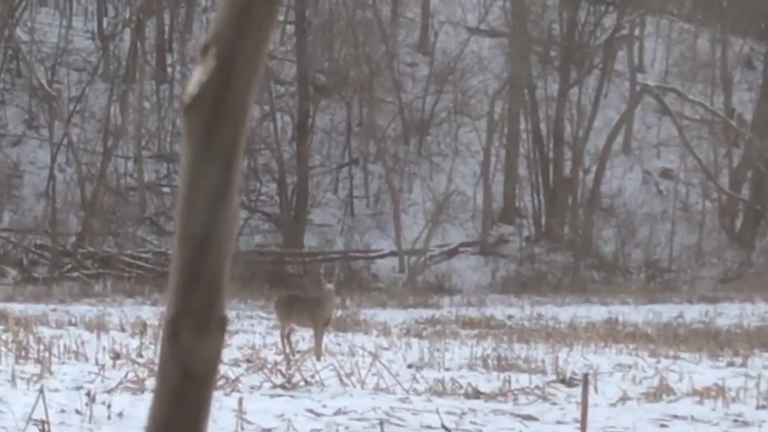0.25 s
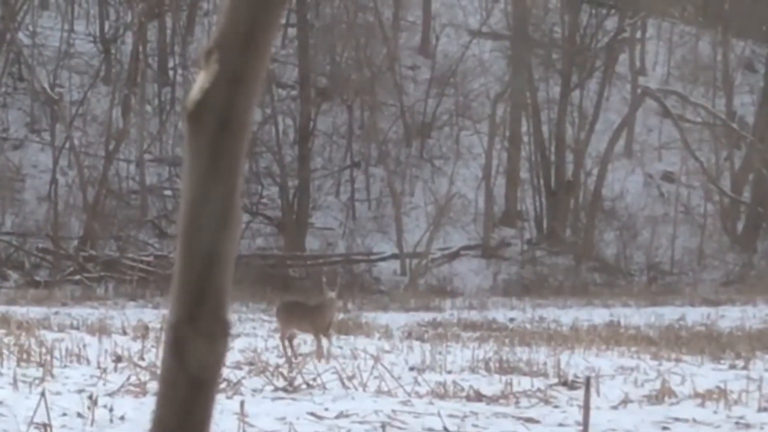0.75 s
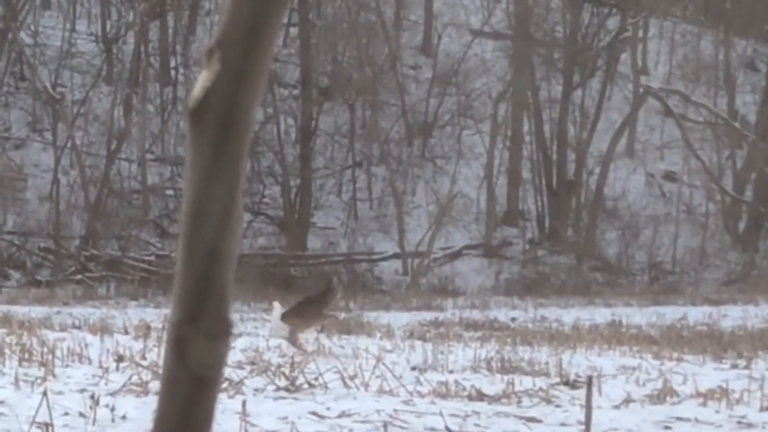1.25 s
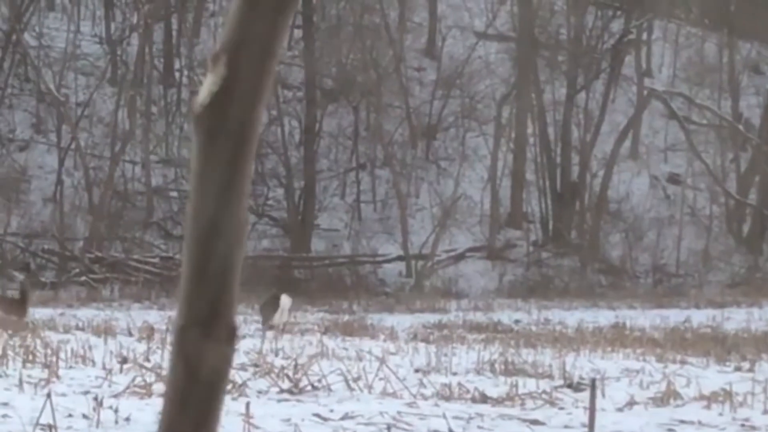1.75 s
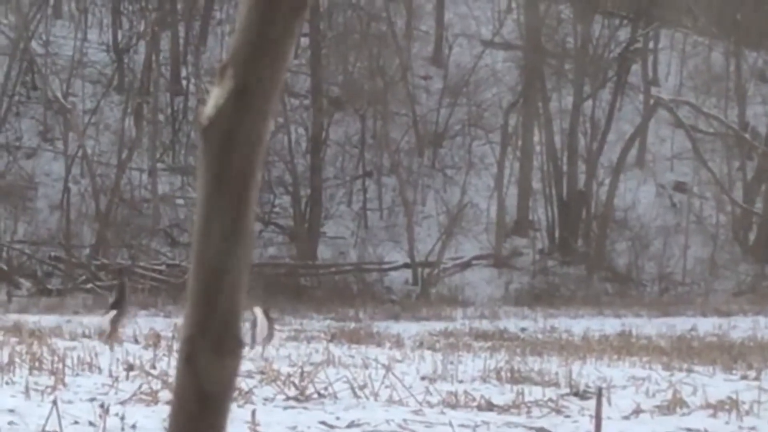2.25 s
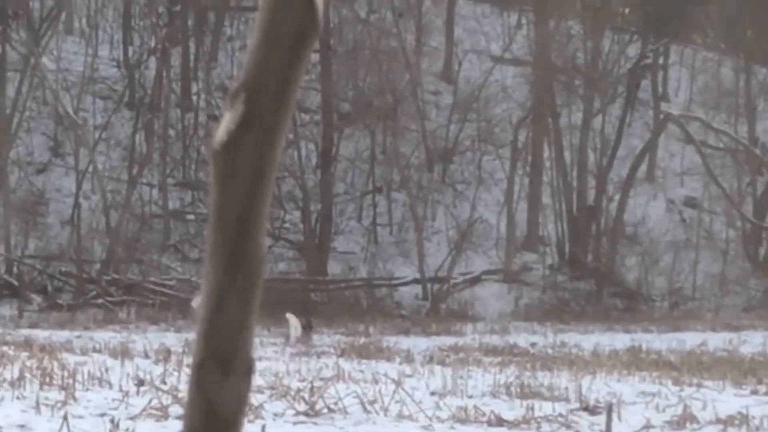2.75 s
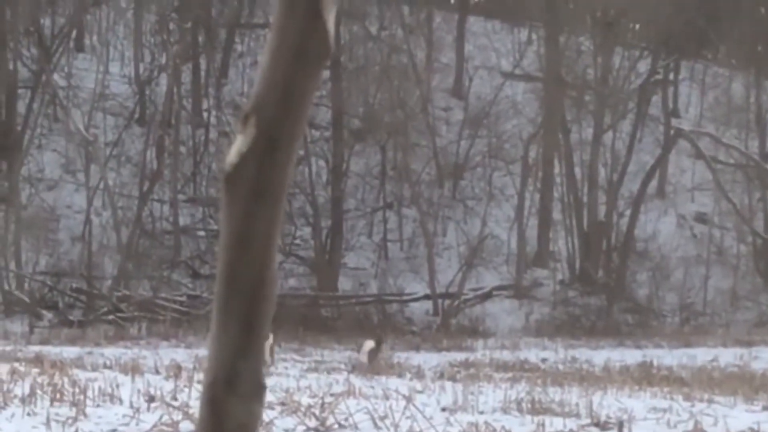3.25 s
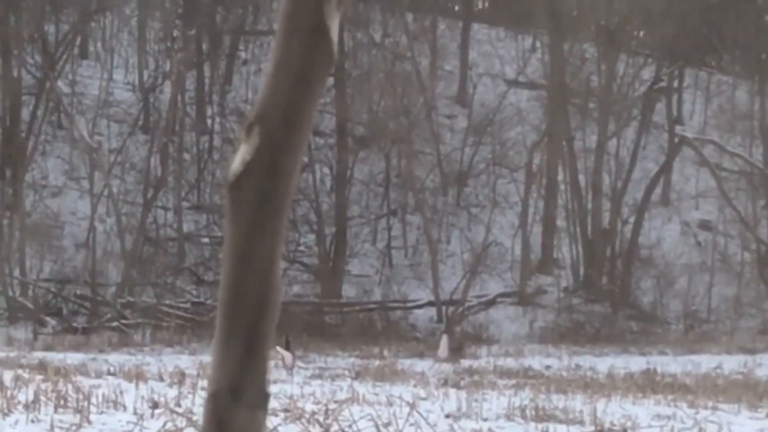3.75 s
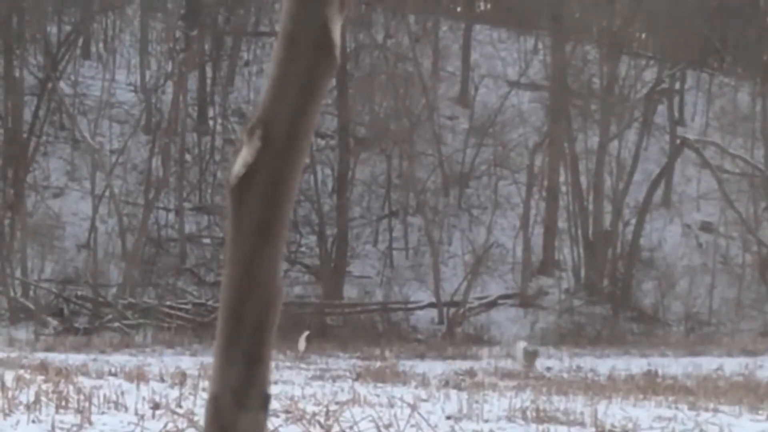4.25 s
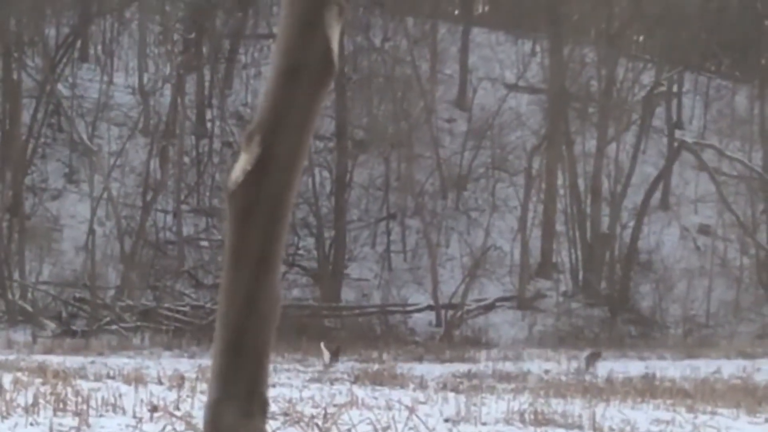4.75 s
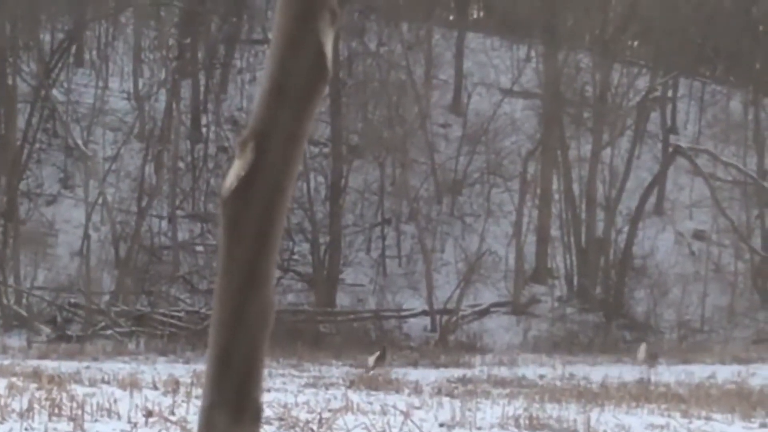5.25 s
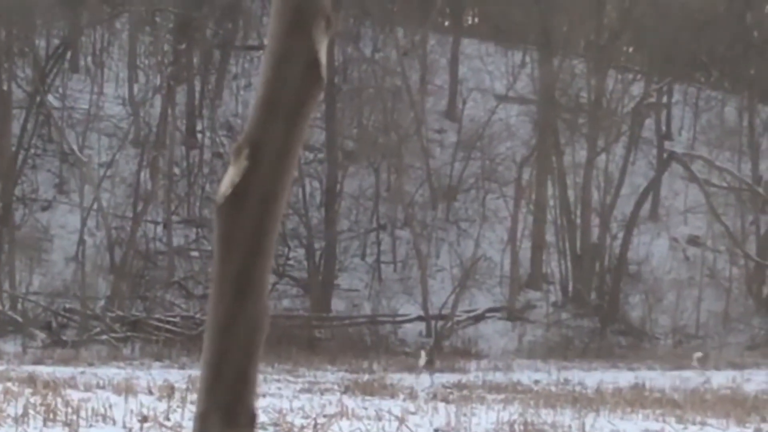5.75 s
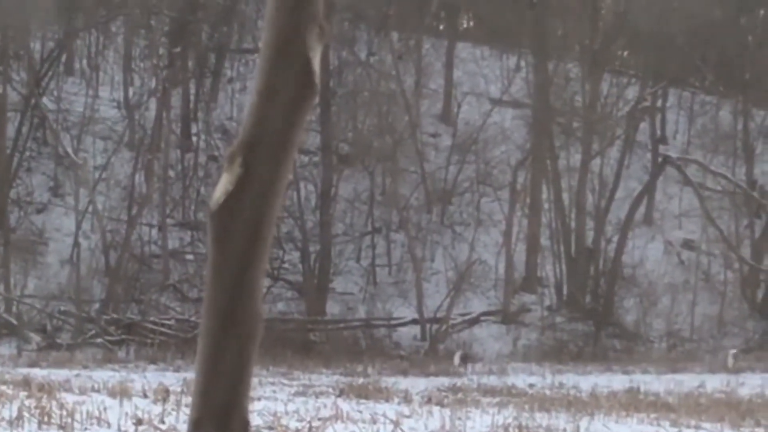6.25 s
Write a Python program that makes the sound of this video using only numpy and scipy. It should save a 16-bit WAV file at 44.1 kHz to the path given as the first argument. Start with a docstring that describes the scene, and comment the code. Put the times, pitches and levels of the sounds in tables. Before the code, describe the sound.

A crossbow fires with a loud, sharp snap, followed by a distant smack and knock, then light clothing rustle and faint clicks.

```python
"""A hunting blind by a snowy field. A crossbow fires close by: the string rasps down the rail,
the limbs slam home and the frame rings. The bolt smacks far out in the field, a knock follows,
and the wooded slope answers faintly. Then clothing rustles and gear ticks and squeaks as a camera
is turned on its mount, over a low outdoor rumble and a thin hiss of air."""
import sys
import numpy as np
from scipy import signal
from scipy.fft import rfft, irfft, next_fast_len
from scipy.io import wavfile
from scipy.ndimage import map_coordinates

SR = 44100
rng = np.random.default_rng(int(sys.argv[2]) if len(sys.argv) > 2 else 0)


def log_audio(samples):
    """Write samples as a 16-bit WAV file to the path given in sys.argv[1]."""
    # one column per channel
    frames = np.atleast_2d(samples).T
    # limit to full scale, then quantise
    limited = np.clip(frames, -1, 1)
    pcm = np.round(limited * 32767).astype(np.int16)
    wavfile.write(sys.argv[1], SR, pcm)


N = 287111
T = np.arange(N) / SR


# Envelopes of the string's run and the limbs' slam. Each: start in seconds, level in dB, then rise,
# hold and t60 in seconds.
STRING_STROKE = (.437, -9, .002, .007, .055)
LIMB_STROKE = (.446, -10.3, .007, .013, .064)
# Tone of the string on the rail, and of the limbs and cams. Each row: frequency in Hz, relative dB.
RAIL_TONE = [(180, -41), (300, -11), (581, -20), (1260, -4), (2480, -15), (2690, -7), (3510, -1),
             (4800, -9), (5130, -3), (6400, -4), (7500, -11), (8420, -8), (13400, -11), (15500, -16)]
SLAM_TONE = [(150, -43), (250, -13), (603, -11), (717, -4), (961, -8), (1290, -2.5), (1530, -11), (1790, 1),
             (2090, -8), (3160, -4), (4100, -12), (4470, -7), (5500, -13), (9230, -12), (15500, -17)]
# Resonances of the stock and riser. Each row: frequency in Hz, width in Hz, relative level in dB.
FRAME_MODES = [(727, 63, -4), (899, 71, -4), (1270, 68, -1), (1750, 49, 0), (2230, 36, -4), (2740, 31, -3),
               (2890, 24, -4), (3180, 75, -2), (3350, 64, -5), (3940, 140, -7), (4320, 37, -4),
               (4540, 71, -6), (5210, 180, -7), (5770, 17, -7), (6000, 45, -6), (6600, 120, -3),
               (6930, 150, -10), (7230, 51, -7), (7420, 25, -11), (7880, 19, -13)]
# Low modes of the limbs and stock, the weight of the shot. Each row: start in seconds, level in dB,
# pitch in Hz, t60 and rise in seconds.
RECOIL_MODES = [(.44, -34, 66, .14, .008), (.4395, -21, 173, .085, .007), (.441, -27, 238, .07, .005),
                (.455, -34, 380, .1, .012), (.446, -28.5, 511, .085, .008), (.445, -28, 727, .07, .008),
                (.441, -24, 897, .07, .008), (.439, -22.5, 1060, .07, .006)]

def crossbow(frame_db):
    """The trigger scrapes, the string runs down the rail, the limbs hit home and shake the frame."""
    trigger = (stroke(.4165, -52, .001, .001, .02) + stroke(.418, -47, .011, .008, .02)) * noise(SLAM_TONE)
    string, limbs = stroke(*STRING_STROKE), stroke(*LIMB_STROKE)
    rasp = string * noise(RAIL_TONE) + limbs * noise(SLAM_TONE)
    chatter = (limbs + string) * rng.standard_normal(N)
    frame = filtered(chatter, lambda f: sum((-1) ** k * amp(db) * resonance(f, hz, width)
                                            for k, (hz, width, db) in enumerate(FRAME_MODES)))
    # the release kicks the whole bow, which shoves the air around it
    recoil = sum(thump(*mode) for mode in RECOIL_MODES)
    return trigger + rasp + amp(frame_db) * frame + recoil


# Ring of the cables and metal fittings. Each row: pitch in Hz, relative dB, uncapped t60 in seconds.
FITTING_PARTIALS = [(248, -18, 3.4), (522, 0, 0.13), (926, -14, 0.27), (1297, 0, 0.14), (1782, -10, 0.45),
                    (2250, -9, 0.24), (2848, -15, 0.41), (3725, -17, 0.21), (4506, 0, 0.15),
                    (5825, -23, 0.28), (6600, -7, 0.19), (6885, -12, 0.11)]
# The slack cable's hum: pitch in Hz, level in dB, t60 in seconds.
CABLE_HUM = (238, -53.5, .3)

def cables(ring_db, longest_t60):
    """Cables and fittings buzz on unsteadily after the shot, over the hum of the slack cable."""
    ring = np.zeros(N)
    for hz, db, t60 in FITTING_PARTIALS:
        envelope = stroke(.45, ring_db + db, .008, .025, min(t60, longest_t60))
        ring += envelope * np.sin(2 * np.pi * hz * T + .8 * wobble(110))
    hum_hz, hum_db, hum_t60 = CABLE_HUM
    return ring + thump(.48, hum_db, hum_hz, hum_t60, rise=.06)


# Tone of the bolt's smack, and of the knock after it. Each row: frequency in Hz, relative dB.
SMACK_TONE = [(410, -39), (700, -9), (1970, -8), (2800, -17), (3150, -2), (4410, -5), (5860, 0),
              (6940, -10), (9720, -5), (15500, -12)]
KNOCK_TONE = [(440, -40), (750, -10), (1130, 2), (1600, -5), (1840, -2), (2250, -5), (2660, -17),
              (3350, -3), (4260, -1), (5020, -14), (6070, -4), (7340, -5), (10600, -20), (13700, -17),
              (15500, -22)]

def bolt_impact():
    """The bolt lands with a crunchy smack; a hard knock follows, its thud sagging in pitch."""
    smack = stroke(.667, -37.5, .003, .002, .022) + stroke(.672, -48.5, .003, .004, .07)
    knock = stroke(.8897, -44, .0005, .001, .01) + stroke(.8913, -33, .0005, .001, .012)
    knock_tail = stroke(.893, -50, .002, 0, .14)
    thud = thump(.893, -42, 170, .04, .003) + thump(.8905, -36.5, 112, .068, .008)  # the low one lingers
    return smack * noise(SMACK_TONE) + (knock + knock_tail) * noise(KNOCK_TONE) + thud


# The hollow of the blind: start in seconds, level in dB, pitch in Hz, t60 and rise in seconds.
BLIND_BOOM = (.475, -43, 135, .16, .012)

def blind():
    """The blind rings and booms briefly around the shot."""
    return stroke(.46, -39, .02, 0, .26) * noise(SLAM_TONE) + thump(*BLIND_BOOM)


# Tone of the echo off the slope. Each row: frequency in Hz, relative dB.
ECHO_TONE = [(100, -9), (250, 0), (520, 2.5), (800, 1.5), (1200, 0), (1700, -3), (4000, -7.5),
             (15000, -13.5)]
# Decay of that echo. Each row: frequency in Hz, t60 in seconds.
ECHO_DECAY = [(200, 2.5), (600, 2.8), (1200, 2.2), (3000, 1.4), (7000, .6), (15000, .4)]

def wooded_slope(level_db, hold_until_s):
    """Ever farther trunks scatter the shot back as a steady wash, which then fades, treble first."""
    hz, t, bands = signal.stft(noise(ECHO_TONE), SR, nperseg=256)
    fade = amp(-60 * np.maximum(t - hold_until_s, 0) / along(ECHO_DECAY, hz)[:, None])
    wash = signal.istft(bands * fade, SR, nperseg=256)[1][:N]
    fade_in = np.clip((T - .45) / .15, 0, 1)
    return amp(level_db) * fade_in * wash


# Small movements of clothing. Each row: moment of top speed in seconds, relative dB, length in seconds.
FABRIC_MOVES = [(.225, -72, .04), (.338, -67, .05), (.9, -67.5, .33), (1.126, -58, .02), (1.27, -73, .03),
                (1.42, -73, .07), (1.601, -68, .16), (1.798, -65, .09), (2.04, -61, .2), (2.47, -59.5, .44),
                (2.778, -62.5, .2), (2.926, -58, .135), (3.087, -59, .087), (3.228, -59.6, .077),
                (3.341, -67, .05), (3.52, -62.4, .18), (3.683, -63, .045), (3.773, -67.5, .02),
                (3.852, -57.5, .055), (3.925, -62, .05), (4.112, -62.4, .05), (4.202, -66.6, .085),
                (4.377, -60.5, .14), (4.487, -61, .05), (4.601, -67, .042), (4.691, -65.5, .04),
                (4.796, -61, .08), (5.063, -60, .06), (5.155, -68, .056), (5.29, -70, .16),
                (5.45, -62.5, .06), (5.83, -67, .07), (6.057, -62, .186), (6.228, -64, .09),
                (6.348, -63, .08), (6.48, -70, .11)]

def fabric_motion(creep_db, edge_db):
    """Envelope of sliding fabric: each move swells and fades; after the shot it never quite rests."""
    power = amp(creep_db) ** 2 * (T > STRING_STROKE[0])
    for s, db, length in FABRIC_MOVES:
        near = np.abs(T - s) < 2 * length
        half_lengths = 2 * (T[near] - s) / length
        power[near] += amp(db - edge_db * half_lengths ** 2) ** 2
    return np.sqrt(power)


# Tone of the fabric's hiss, and of its rumble in the mount. Each row: frequency in Hz, relative dB.
FABRIC_TONE = [(300, -15), (600, -6), (1200, -6), (1800, -3), (4000, -3.5), (5900, -2), (7700, -7),
               (9000, -4), (10400, -9), (12500, -4.5), (15500, -9.5)]
HANDLING_TONE = [(30, -14), (90, -4), (170, 0), (280, -13), (500, -16), (900, -40)]

def clothing(slide_db, flutter_db, handling_db, catches_per_s, spread_db, crackle_db):
    """Fabric slides with a hiss, fibres catch and let go, and the motion rumbles through the mount."""
    motion = fabric_motion(creep_db=-80.5, edge_db=6)
    catches = rng.random(N) < catches_per_s / SR
    strength = amp(spread_db * np.minimum(rng.exponential(size=N), 3))
    grain_envelope = signal.fftconvolve(catches * strength, np.hanning(48))[:N]
    grains = coloured(grain_envelope * rng.standard_normal(N), FABRIC_TONE)
    brisk = amp(-60)  # level of a brisk movement
    # the power below 1 keeps slow motion crackling when the hiss has almost gone
    crackle = amp(crackle_db) * brisk * (motion / brisk) ** .75 * grains
    slide = amp(slide_db + flutter_db * wobble(60)) * motion
    return slide * (noise(FABRIC_TONE) + amp(handling_db) * noise(HANDLING_TONE)) + crackle


# Scuffs of a sleeve. Each row: start in seconds, level in dB, hold in seconds.
SLEEVE_SCUFFS = [(.315, -70, .02), (1.025, -65, .03), (1.13, -63, .014), (1.255, -67, .012),
                 (1.5, -69, .15), (1.97, -64, .12), (2.28, -67.5, .7), (4.15, -70.5, .3), (6.02, -70, .04)]
# Their dull tone. Each row: frequency in Hz, relative dB.
SLEEVE_TONE = [(150, -4), (500, -3), (1000, -1), (1900, 0), (3000, -8), (6000, -16), (15000, -28)]

def sleeve():
    """A sleeve rubs in soft, dull scuffs."""
    return sum(stroke(s, db, .012, hold, .12) for s, db, hold in SLEEVE_SCUFFS) * noise(SLEEVE_TONE)


# Ticks of the gear. Each row: start in seconds, relative level in dB, centre frequency in Hz.
GEAR_TICKS = [(1.4391, -47, 3530), (1.8073, -35, 3470), (2.0118, -44, 1690), (2.3585, -38, 6000),
              (2.379, -39, 11600), (2.4054, -38, 6050), (2.7227, -41, 12300), (3.4516, -41, 6090),
              (3.5942, -46, 5250), (3.6745, -40, 12500)]

def gear(level_db, base_t60, width_at_4k_hz):
    """Each small contact is a noise burst in one resonance; lower ones are narrower and ring longer."""
    ticks = np.zeros(N + SR)
    t = np.arange(SR // 10) / SR
    f = np.fft.rfftfreq(len(t), 1 / SR)
    for s, db, hz in GEAR_TICKS:
        width = width_at_4k_hz * (hz / 4000) ** 1.5
        burst = unit(irfft(rfft(rng.standard_normal(len(t))) * resonance(f, hz, width), len(t)))
        t60 = base_t60 + 5 / width
        ticks[round(s * SR):][:len(t)] += amp(db + level_db - 60 * t / t60) * burst
    return ticks[:N]


# Soft bumps and tiny squeaks of the mount. Each row: start in seconds, relative dB, pitch in Hz.
MOUNT_BUMPS = [(1.059, -48, 172), (1.134, -46, 132), (1.269, -52, 151), (1.436, -48, 121),
               (1.989, -48, 105), (2.749, -47, 108), (5.15, -47, 116), (6.033, -49, 83.4)]
MOUNT_SQUEAKS = [(3.480, -57, 3190), (5.227, -59, 1324)]

def mount(bump_db):
    """The camera mount takes low bumps, and sticks and slips with brief pitched squeaks."""
    bumps = sum(thump(s, db + bump_db, hz, t60=.08, rise=.008) for s, db, hz in MOUNT_BUMPS)
    squeaks = sum(thump(s, db, hz, t60=.035, rise=.003) for s, db, hz in MOUNT_SQUEAKS)
    return bumps + squeaks


# Tone of the outdoor rumble, and of the air's hiss. Each row: frequency in Hz, relative dB.
RUMBLE_TONE = [(12, -46), (25, -16), (40, -2), (64, .5), (110, -4), (140, -7.5), (200, -10), (260, -14.5),
               (310, -20), (400, -22), (600, -45)]
AIR_TONE = [(100, -10), (300, -2), (600, -5), (1200, -7.5), (1700, -9.5), (1880, -4), (2080, -10),
            (3000, -12), (8000, -17), (15500, -18.5)]
# Slow swells of the rumble. Each row: time in seconds, relative level in dB.
RUMBLE_SWELLS = [(0, -68), (.6, -64), (1.8, -63.5), (2.9, -58.5), (3.5, -64), (4.4, -62.5), (5.8, -65),
                 (6.1, -62.5), (6.5, -63.5)]

def outdoors(rumble_db, waver_db, air_db, air_rise_db, air_rise_s):
    """A bed of wavering low rumble and faint open-air hiss; the hiss lifts a little after the shot."""
    swell_db = np.interp(T, *np.transpose(RUMBLE_SWELLS))
    rumble = amp(swell_db + rumble_db + waver_db * wobble(9)) * noise(RUMBLE_TONE)
    lift = np.clip((T - STRING_STROKE[0]) / air_rise_s, 0, 1)
    return rumble + amp(air_db + air_rise_db * lift) * noise(AIR_TONE)


def stroke(start, db, rise, hold, t60):
    """An envelope that rises, holds, then falls 60 dB every t60 seconds."""
    envelope = np.zeros(N)
    live = slice(int(start * SR), int((start + rise + hold + 2 * t60) * SR))
    t = T[live] - start
    envelope[live] = np.clip(t / rise, 0, 1) * amp(db - 60 * np.maximum(t - rise - hold, 0) / t60)
    return envelope


def thump(start, db, hz, t60, rise):
    """One struck mode: a damped sine."""
    return stroke(start, db, rise, 0, t60) * np.sin(2 * np.pi * hz * (T - start))


def resonance(f, hz, width):
    """Response of one damped mode at the frequencies f."""
    return 1j * f * width / (hz * hz - f * f + 1j * f * width)


def noise(tone):
    """Coloured noise at rms 1."""
    return coloured(rng.standard_normal(N), tone)


def coloured(x, tone):
    """x equalised by a tone table, at rms 1."""
    return unit(filtered(x, lambda hz: amp(along(tone, hz))))


def filtered(x, response):
    """x through a complex frequency response."""
    size = next_fast_len(N + SR // 2)
    return irfft(rfft(x, size) * response(np.fft.rfftfreq(size, 1 / SR)), size)[:N]


def along(points, hz):
    """Interpolate (Hz, value) points on a log frequency axis."""
    freqs, values = np.transpose(points)
    return np.interp(np.log(hz + 1), np.log(freqs + 1), values)


def wobble(rate):
    """A smooth random curve, rate knots a second."""
    return map_coordinates(rng.standard_normal(int(N * rate / SR) + 4), [T * rate])


def amp(db):
    """Decibels to gain."""
    return 10 ** (np.asarray(db) / 20)


def unit(x):
    """Scale to rms 1."""
    return x / np.sqrt(np.mean(x ** 2) + 1e-20)


def scene():
    """The shot, its echo, the bolt and the small movements in the blind over the outdoor bed, in mono."""
    shot = crossbow(frame_db=-1) + cables(ring_db=-39, longest_t60=.5)
    space = blind() + wooded_slope(level_db=-62.2, hold_until_s=.98)
    hit = bolt_impact()
    rustle = clothing(slide_db=-1.7, flutter_db=1.6, handling_db=-9,
                      catches_per_s=170, spread_db=4.5, crackle_db=-3.8) + sleeve()
    contacts = gear(level_db=-7, base_t60=.019, width_at_4k_hz=2200) + mount(bump_db=-1)
    bed = outdoors(rumble_db=1.1, waver_db=1.4, air_db=-73.5, air_rise_db=3, air_rise_s=1.1)
    return (shot + space + hit + rustle + contacts + bed)[None]


def record(dry):
    """A soft clip rounds off the highest peaks, and a steep low-pass cuts the top at 16 kHz."""
    rounded = dry[0] / (1 + np.abs(dry[0]) ** 6) ** (1 / 6)
    return filtered(rounded, lambda hz: np.clip((16000 - hz) / 500 + .5, 0, 1) ** 2)[None]


dry = scene()
out = record(dry)
log_audio(out)
```